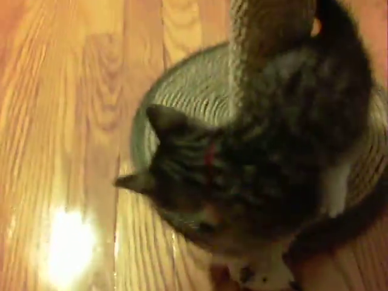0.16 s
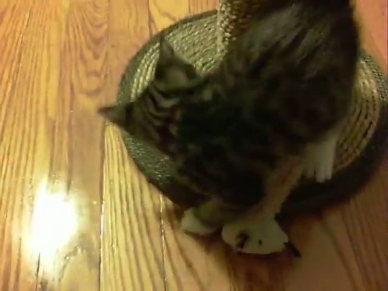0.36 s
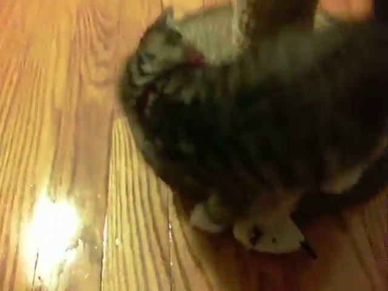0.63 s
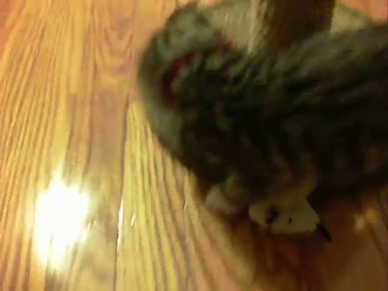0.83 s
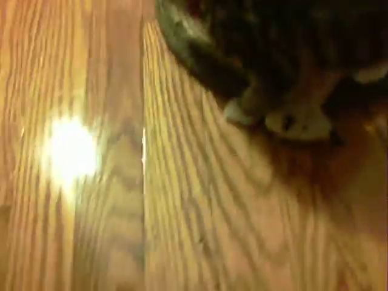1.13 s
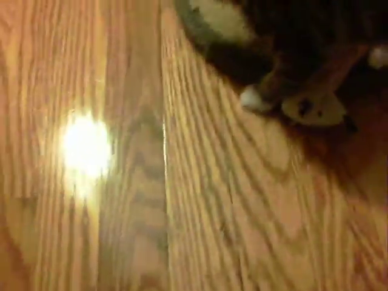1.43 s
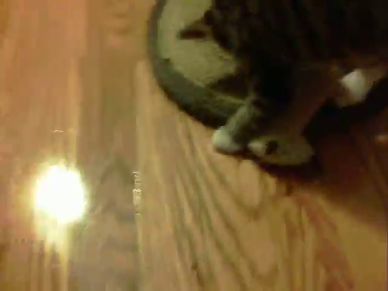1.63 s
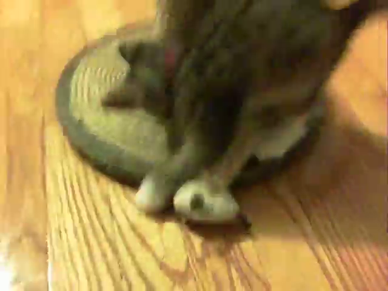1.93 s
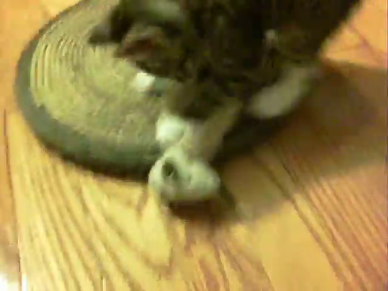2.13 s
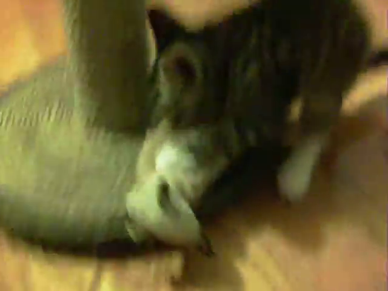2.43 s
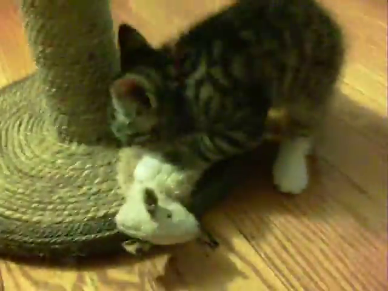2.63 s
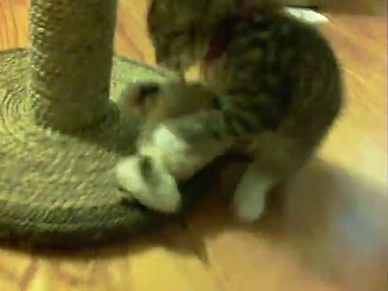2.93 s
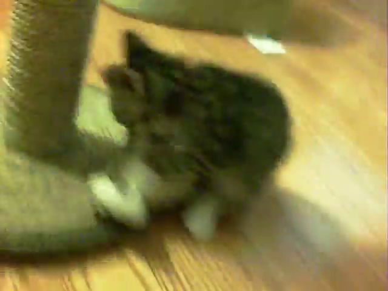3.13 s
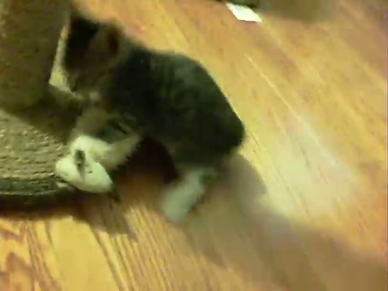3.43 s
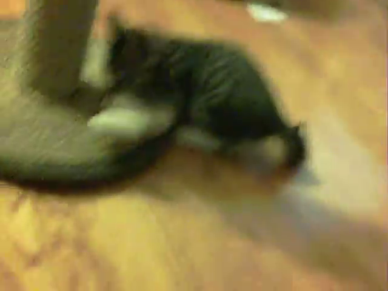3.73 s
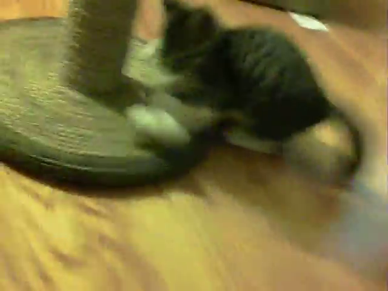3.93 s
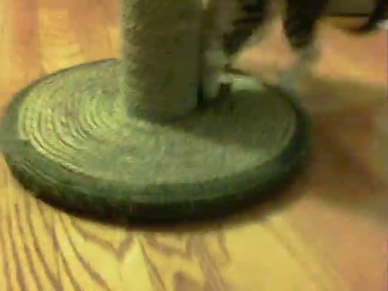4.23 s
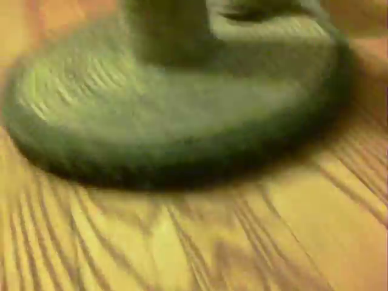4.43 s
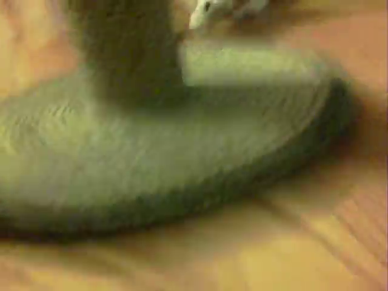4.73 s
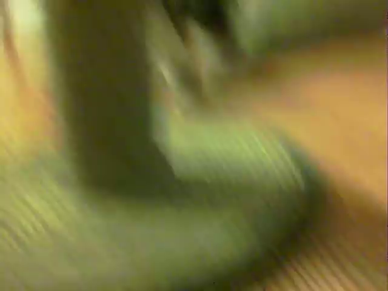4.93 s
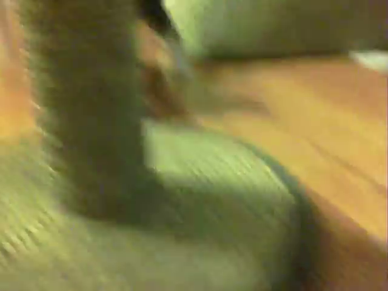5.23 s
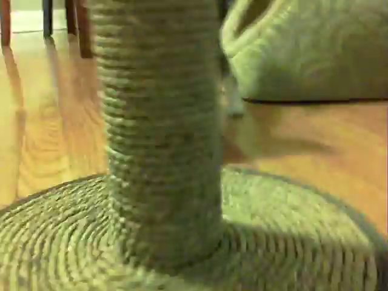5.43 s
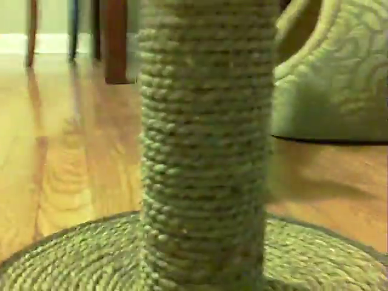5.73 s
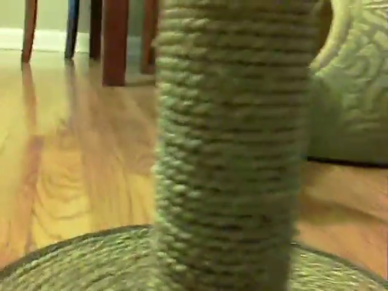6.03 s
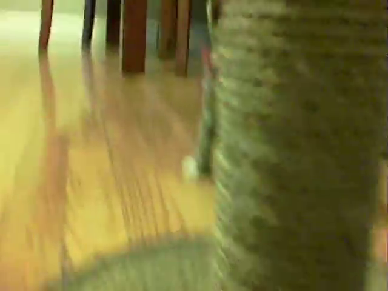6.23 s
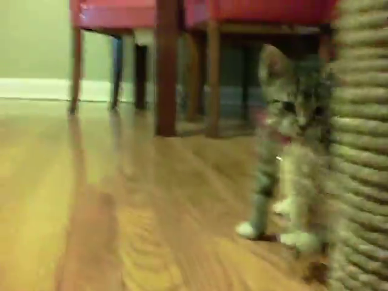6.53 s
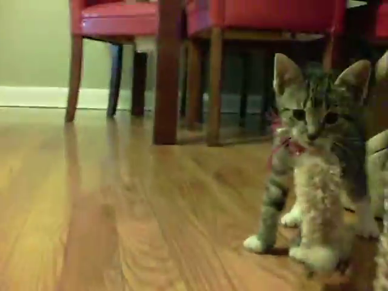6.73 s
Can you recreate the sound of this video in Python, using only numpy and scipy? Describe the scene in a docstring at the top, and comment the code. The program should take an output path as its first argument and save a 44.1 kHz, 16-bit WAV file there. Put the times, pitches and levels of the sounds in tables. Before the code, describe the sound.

Indoors, close to a small hand-held camera, low rumble and even hiss run throughout. A faint claw tick and tiny collar bell come first, then a kitten's claws scrape rope and tap wood. Hard, dry plastic clicks from the shifting camera case burst out near two, three and nearly five seconds, overloading the narrow microphone.

```python
"""First a low rumble and an even hiss, then a faint claw tick and the tinkle of a small collar bell: a kitten
wrestles a soft toy on a rope scratching post, close to the microphone of a small hand-held camera.
Claws tick (struck modes), fur and claws scrape the rope (shaped noise), base and wooden floor thud (fading sines).
The loudest sounds are dry clicks and bumps, most likely the plastic case shifting in the hand: pushes, modes
and slow pressure swings. The microphone is narrow-band and overloads on the hardest clicks."""
import sys
import numpy as np
from scipy import signal
from scipy.fft import rfft, irfft, next_fast_len
from scipy.io import wavfile
from scipy.ndimage import uniform_filter1d, map_coordinates

SR = 44100
rng = np.random.default_rng(int(sys.argv[2]) if len(sys.argv) > 2 else 0)


def waveform_to_disk(signal):
    """Save audio, clipped to [-1, 1], as 16-bit WAV at the path in sys.argv[1]."""
    frames = np.transpose(np.atleast_2d(signal))
    scaled = np.clip(frames, -1, 1) * 32767
    samples = np.round(scaled).astype(np.int16)
    wavfile.write(sys.argv[1], SR, samples)


N = 302967


def amp(db):
    """Decibels to gain."""
    return 10 ** (np.asarray(db) / 20)


def unit(x):
    """x at rms 1."""
    return x / np.sqrt(np.mean(x ** 2) + 1e-20)


def crest(x):
    """x at peak 1."""
    return x / np.max(np.abs(x))


def add(track, start_s, sound):
    """Mix a sound into the track from a given time."""
    part = track[round(start_s * SR):][:len(sound)]
    part += sound[:len(part)]


def filtered(x, response):
    """x shaped by a gain that is a function of frequency [Hz]."""
    size = next_fast_len(N + 8192)
    return irfft(rfft(x, size) * response(np.fft.rfftfreq(size, 1 / SR)), size)[:N]


def coloured(x, spectrum):
    """x shaped by (frequency [Hz], level [dB]) points, at rms 1."""
    f, db = np.transpose(spectrum)
    return unit(filtered(x, lambda hz: amp(np.interp(np.log(hz + 1), np.log(f + 1), db))))


def wobble(rate):
    """A smooth random curve with a given number of knots a second."""
    knots = rng.standard_normal(int(N * rate / SR) + 4)
    return map_coordinates(knots, [np.arange(N) * rate / SR])


def ring(modes, detune, spread_db):
    """Struck modes fade exponentially, a little different in pitch and level at every blow."""
    t = np.arange(SR // 8) / SR
    total = np.zeros(len(t))
    for hz, db, t60 in modes:
        fade = amp(db + spread_db * rng.normal() - 60 * t / t60)
        total += fade * np.cos(2 * np.pi * hz * (1 + detune * rng.normal()) * t)
    return total


def slip(modes, swell):
    """A quick slip builds up the modes over about swell [s]; they die at once."""
    sound = ring(modes, detune=0.012, spread_db=3)
    t = np.arange(len(sound)) / SR
    return crest(sound * (1 - np.exp(-(t / swell) ** 2)))


# the case under a blunt push: (frequency [Hz], relative level [dB])
PUSH_SPECTRUM = [(40, -10), (110, 0.5), (200, -0.5), (500, -4.5), (680, -4.5), (810, -1.5), (980, -15),
                 (1300, -9), (1900, -23.5), (2450, -16.5), (3300, -49.5), (6000, -51)]


def knock(ripple_db):
    """The case's answer to one push; its colour shifts with the place that is pressed."""
    size = 2048
    hz = np.fft.rfftfreq(size, 1 / SR)
    f, db = np.transpose(PUSH_SPECTRUM)
    ripple = ripple_db * unit(uniform_filter1d(rng.standard_normal(len(hz)), size=7))
    level_db = np.interp(np.log(hz + 1), np.log(f), db) + ripple
    cepstrum = irfft(np.log(amp(level_db)))
    # folding the cepstrum makes the ring follow the push
    return crest(irfft(np.exp(rfft(2 * cepstrum[:size // 2], size))))


# sharp contacts of the case in the hand, levels before the trims:
# (time [s], snap level [dB], knock level [dB], crack level [dB])
CASE_CONTACTS = [(1.7481, -28, -51, -40), (1.7992, -15.5, -38, -27), (1.8428, -2, -21.5, -10),
                 (1.8501, -23.5, -43.5, -28.5), (3.1127, -4, -24.5, -10), (3.1702, -35.5, -26.5, -28),
                 (3.594, -30, -37, -39), (3.6216, -35, -28, -31.5), (3.6288, -33.5, -30, -49),
                 (3.6538, -17, -27.5, -27.5), (3.71, -31, -28.5, -38), (3.746, -36, -34.5, -49),
                 (4.713, -33, -20, -25), (4.7453, -25, -35, -33.5), (4.7592, -13.5, -28, -32),
                 (4.7718, -11, -31, -42), (4.7965, -35.5, -31.5, -43), (4.9216, -38, -22.5, -35.5),
                 (4.9366, -39, -26, -53), (5.0021, -50, -40, -50), (5.5947, -30.5, -29.5, -33),
                 (6.2061, -23, -21.5, -32.5), (6.2488, -31.5, -21.5, -38.5), (6.2879, -35, -23, -45),
                 (6.3159, -30, -20.5, -35), (6.822, -53, -36, -53)]
# stiff edges of the case, also used for claw ticks: (frequency [Hz], relative level [dB], t60 [s])
EDGE_MODES = [(3996, -9.5, .006), (4550, -7, 0.007), (4994, 0, 0.0066), (5374, -8.5, 0.0054)]
# panels of the case: (frequency [Hz], relative level [dB], t60 [s])
PANEL_MODES = [(1346, -5, 0.00608), (1622, -5.5, .004), (2030, -7, 0.0056), (2572, 2, 0.0058),
               (2952, -5, 0.0062)]


def case_clicks(knock_db=9, crack_db=6, snap_db=2, lag=0.00018, release=0.00099, hard_db=1):
    """Each shift of the case is a blunt push, a crack of the panels and a bright snap."""
    out = np.zeros(N)
    for s, bright_db, blunt_db, panel_db in CASE_CONTACTS:
        bluntness = amp(blunt_db) / (amp(blunt_db) + amp(bright_db))
        # the hardest snaps shake the whole case most
        shake_db = hard_db * amp(bright_db)
        push = amp(blunt_db + knock_db + shake_db) * knock(ripple_db=1.5)
        crack = amp(panel_db + crack_db + shake_db) * slip(PANEL_MODES, swell=0.00091)
        snap = amp(bright_db + snap_db) * slip(EDGE_MODES, swell=0.00092)
        add(out, s + lag, push)
        add(out, s + lag, crack)
        # after a blunt push the edge lets go a moment later
        add(out, s + release * bluntness, snap)
    return out


# the clearest claw ticks, close by: (time [s], level before the trim [dB])
CLEAR_TICKS = [(0.1989, -40.5), (1.3872, -41), (1.411, -41), (1.5552, -36.5), (1.6235, -44), (1.637, -37.5),
               (2.011, -37), (2.5335, -38), (2.591, -40.5), (3.034, -40), (3.5256, -41), (3.5667, -35.5),
               (3.7928, -38), (3.8882, -36), (4.0243, -42), (4.9555, -32.5), (5.027, -40), (5.256, -38),
               (5.2696, -32.5), (5.2757, -36), (5.5342, -39), (5.823, -36), (6.5365, -41)]
# the kitten wrestles from, to [s]
PLAY_FROM_S, PLAY_TO_S = 1.8, 5.1
# fainter ticks during the play: mean number [per s], level before the trim [dB]
TICKS_PER_S, FAINT_TICK_DB = 4.1, -44


def claws(tick_db=2):
    """Claw tips catch and let go: clear ticks among faint, chance ones."""
    out = np.zeros(N)
    play_s = PLAY_TO_S - PLAY_FROM_S
    chance = rng.random(round(TICKS_PER_S * play_s))
    faint = [(PLAY_FROM_S + u * play_s, FAINT_TICK_DB) for u in chance]
    for s, db in list(CLEAR_TICKS) + faint:
        add(out, s, amp(db + tick_db) * slip(EDGE_MODES, swell=0.00094))
    return out


# rubbing strokes, close by: (time of the peak [s], length [s], rasp level [dB], body level [dB])
RUB_STROKES = [(0.696, .02, -73, -45.5), (1.448, 0.09, -40, -55), (1.701, 0.025, -39.5, -57),
               (1.779, .042, -32, -44), (1.844, 0.025, -35, -46.5), (2.157, .033, -61, -48),
               (2.295, 0.31, -56, -53), (2.544, 0.028, -55, -52), (2.665, 0.066, -50.5, -70),
               (2.728, 0.066, -38, -58), (3.2, 0.14, -44, -43.5), (3.382, 0.081, -53, -52.5),
               (3.63, .016, -48, -42), (3.76, 0.016, -48, -59), (3.906, .022, -40, -45),
               (4.05, .14, -54, -54), (4.256, 0.14, -49, -46.5), (4.442, .13, -48.5, -48.5),
               (4.589, 0.047, -36, -39), (4.727, 0.017, -34, -39.5), (4.766, 0.03, -25, -29),
               (4.813, .056, -49, -46), (4.956, .046, -46.5, -75), (5.37, 0.22, -59, -52),
               (5.833, .11, -51, -78), (6.545, 0.018, -48, -48)]
# share of a stroke spent pressing in
RISE_SHARE = .47
# the scuff that trails each case contact
SCUFF_RISE_S, SCUFF_FALL_S = 0.0046, 0.0082


def rubbing(scuff_rasp_db=-13, scuff_body_db=-15, top_rasp_db=-41, top_body_db=-45):
    """Strokes, and a brief scuff after each case contact that grows with its force up to a limit."""
    strokes = []
    for s, length, bright_db, dull_db in RUB_STROKES:
        strokes.append((s, RISE_SHARE * length, (1 - RISE_SHARE) * length, bright_db, dull_db))
    scuffs = []
    for s, bright_db, blunt_db, _ in CASE_CONTACTS:
        rasp_db = min(bright_db + scuff_rasp_db, top_rasp_db)
        body_db = min(blunt_db + scuff_body_db, top_body_db)
        scuffs.append((s + SCUFF_RISE_S, SCUFF_RISE_S, SCUFF_FALL_S, rasp_db, body_db))
    return strokes + scuffs


# the bright rasp: (frequency [Hz], relative level [dB per Hz])
RASP_SPECTRUM = [(500, -25.5), (1800, -21), (2500, -10.5), (3050, -12.5), (3800, -13), (4400, -5.5),
                 (4950, 1.5), (5500, -12.5), (6200, -20)]
# the duller rub: (frequency [Hz], relative level [dB per Hz])
BODY_SPECTRUM = [(100, 0.5), (300, -4.5), (800, -2.5), (1000, -8), (1350, -6.5), (1900, -8), (2450, -6),
                 (3300, -10), (4300, -13), (6000, -26)]


def scrapes(grain_db=4, clump_db=3.0, snag_rate=200, snag_db=9):
    """Fibres slip in clumps under each stroke, and some snag: a bright rasp and a duller rub."""
    t = np.arange(N) / SR
    rasp, body = np.zeros(N), np.zeros(N)
    for s, rise, fall, bright_db, dull_db in rubbing():
        pressure = np.exp(-np.abs((t - s) / np.where(t < s, rise, fall)) ** 1.5)
        rasp += amp(bright_db) * pressure
        body += amp(dull_db) * pressure
    fibres = amp(grain_db * wobble(700) + clump_db * wobble(110))
    # chance single-sample kicks, snag_rate a second on average
    snags = amp(snag_db) * (rng.random(N) < snag_rate / SR) * rng.uniform(1, 2, N)
    slips = fibres * rng.standard_normal((2, N)) + snags
    return rasp * coloured(slips[0], RASP_SPECTRUM) + body * coloured(slips[1], BODY_SPECTRUM)


# shakes of the collar bell: (time [s], level before the trim [dB])
BELL_SHAKES = [(0.4066, -45), (0.4794, -42), (0.5402, -42), (0.623, -38.5), (0.7393, -42), (0.803, -42),
               (1.871, -47), (1.9103, -46), (2.0682, -45.5), (2.8924, -33.5), (2.982, -43), (3.056, -35),
               (3.414, -34.5), (3.5952, -34), (3.6405, -29), (3.7184, -39), (3.809, -33.5), (4.0234, -42),
               (4.1124, -45), (4.4967, -34)]
# the small shell: (frequency [Hz], relative level [dB], t60 [s])
BELL_MODES = [(5210, 2.5, 0.06), (5500, -2, .014), (5840, 0.66, 0.014)]
# the pellet in the shell: mean time between strikes [s], loss a strike [dB]
BOUNCE_S, BOUNCE_LOSS_DB = .006, 4


def collar_bell(bell_db=1, rattle=.002, count=5):
    """At each shake the pellet strikes the shell, then bounces round it unevenly and ever more weakly."""
    out, t = np.zeros(N), np.arange(SR // 20) / SR
    for s, db in BELL_SHAKES:
        pellet = np.zeros(SR // 10)
        flights = BOUNCE_S * rng.gamma(3, 1 / 3, count)
        delays = np.cumsum(flights) - flights[0]
        for k, delay in enumerate(delays):
            burst = rng.standard_normal(len(t)) * np.exp(-t / rattle)
            add(pellet, delay, amp(-BOUNCE_LOSS_DB * k) * burst)
        shell = ring(BELL_MODES, detune=0.0035, spread_db=2.5)
        add(out, s, amp(db + bell_db) * crest(signal.fftconvolve(shell, pellet)))
    return out


# soft taps and falls on the base and the floor: (time [s], level [dB], pitch [Hz])
SOFT_FALLS = [(.683, -36, 726), (.683, -34, 1570), (1.266, -37, 274), (2.154, -35.5, 336),
              (2.171, -35, 132.4), (2.286, -35.5, 148), (2.558, -40, 1260), (2.919, -36, 70),
              (2.935, -35, 158), (3.187, -31.5, 203), (3.356, -32.5, 131), (3.592, -33.5, 1560),
              (3.654, -26, 825), (3.711, -24, 796), (4.506, -37, 280), (4.561, -36.5, 168),
              (4.785, -39, 203), (5.290, -31, 92.6), (5.305, -33, 182), (5.36, -36, 135)]
# the main mode dies away by 60 dB in the same number of cycles at any pitch
RING_CYCLES = 23.5


def thuds(overtone=1.6, overtone_db=-10, puff_db=-7, puff_hz=900):
    """Padded blows wake a wooden mode, a weaker one above it and a blur of short-lived others."""
    out, t = np.zeros(N), np.arange(SR // 2) / SR
    for s, db, hz in SOFT_FALLS:
        fade = amp(-60 * t * hz / RING_CYCLES)
        lowpass = signal.butter(2, puff_hz, fs=SR)
        blur = unit(signal.lfilter(*lowpass, rng.standard_normal(len(t))))
        upper = amp(overtone_db) * np.sin(2 * np.pi * hz * overtone * t) + amp(puff_db) * blur
        wood = fade * np.sin(2 * np.pi * hz * t) + fade ** 3.5 * upper
        # the padding softens the onset
        add(out, s, amp(db) * crest(wood * (1 - np.exp(-t * hz))))
    return out


# the hand jolts the camera: (time of the middle [s], level before the envelope [dB], pitch [Hz])
HAND_JOLTS = [(1.803, -31, 58), (1.853, -20.5, 49), (2.943, -28, 22), (3.624, -26.5, 50),
              (3.711, -29, 45.3), (4.022, -26.5, 28), (4.752, -11, 22.6), (4.762, -31, 90),
              (4.806, -19.5, 27.7), (5.298, -23, 53.6), (5.605, -29, 47.4), (5.87, -28, 36.2),
              (6.551, -27, 28.6)]


def jolts(cycles=0.618):
    """Each jolt is one slow swing of pressure at the microphone."""
    t = np.arange(N) / SR
    out = np.zeros(N)
    for s, db, hz in HAND_JOLTS:
        envelope = np.exp(-((t - s) * hz / cycles) ** 2)
        out -= amp(db) * np.sin(2 * np.pi * hz * (t - s)) * envelope
    return out


# rumble of the hand that follows the kitten: (frequency [Hz], relative level [dB per Hz])
HAND_SPECTRUM = [(25, -7), (65, 0.5), (130, -8.5), (300, -25.5), (1000, -60.5)]
# it sets in when the camera starts to move: start [s], rise [s], level [dB]
HAND_FROM_S, HAND_RISE_S, HAND_DB = 1.1, .5, -52.5


def hand():
    """The moving hand rumbles faintly through the case."""
    moving = np.clip((np.arange(N) / SR - HAND_FROM_S) / HAND_RISE_S, 0, 1)
    return amp(HAND_DB) * moving * coloured(rng.standard_normal(N), HAND_SPECTRUM)


# background of the room: (frequency [Hz], relative level [dB])
ROOM_SPECTRUM = [(18, -3), (30, -8), (55, -13), (100, -18.5), (200, -24), (320, -27), (500, -32),
                 (900, -35.5), (1800, -39.3), (3600, -40), (4900, -39), (6000, -56)]
# level about which the background drifts [dB]
ROOM_DB = -40.5


def room(drift_db=1.6):
    """Low rumble and an even hiss: shaped noise whose level drifts slightly."""
    level = amp(ROOM_DB + drift_db * wobble(5))
    return level * coloured(rng.standard_normal(N), ROOM_SPECTRUM)


def scene():
    """Everything is close to the microphone, and dry."""
    contact = case_clicks() + claws() + scrapes()
    struck = collar_bell() + thuds() + jolts()
    return (contact + struck + hand() + room())[None]


# upper limits of the microphone and of the output after overload
MIC_HZ, TOP_HZ = 5834, 16200


def record(dry, ceiling=0.89, offset=0.02, hardness=8):
    """A narrow-band microphone with a small steady offset; the hardest clicks overload it."""
    narrow = filtered(dry[0], lambda hz: 1 / np.sqrt(1 + (hz / MIC_HZ) ** 70))
    driven = narrow + offset
    clipped = driven / (1 + np.abs(driven / ceiling) ** hardness) ** (1 / hardness)
    limited = filtered(clipped - offset, lambda hz: 1 / np.sqrt(1 + (hz / TOP_HZ) ** 120))
    return offset + limited[None]


dry = scene()
out = record(dry)
waveform_to_disk(out)
```